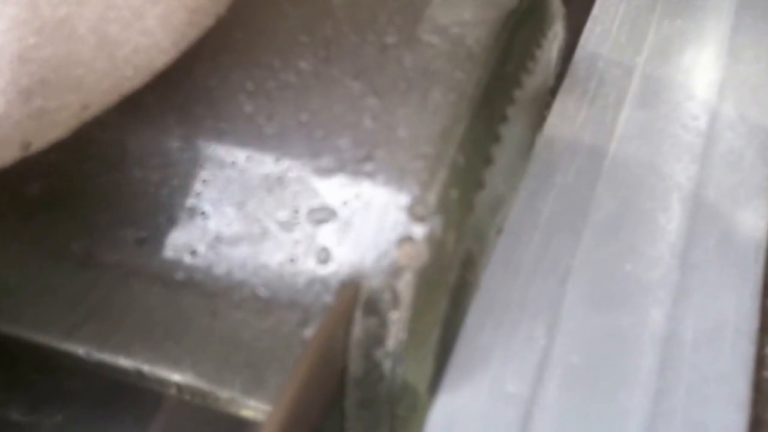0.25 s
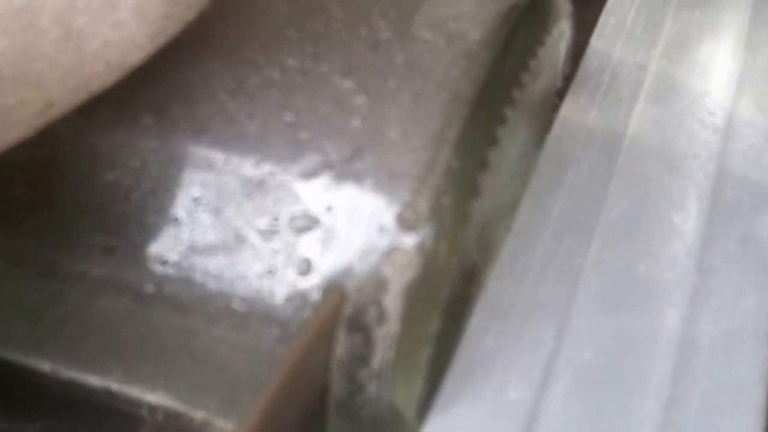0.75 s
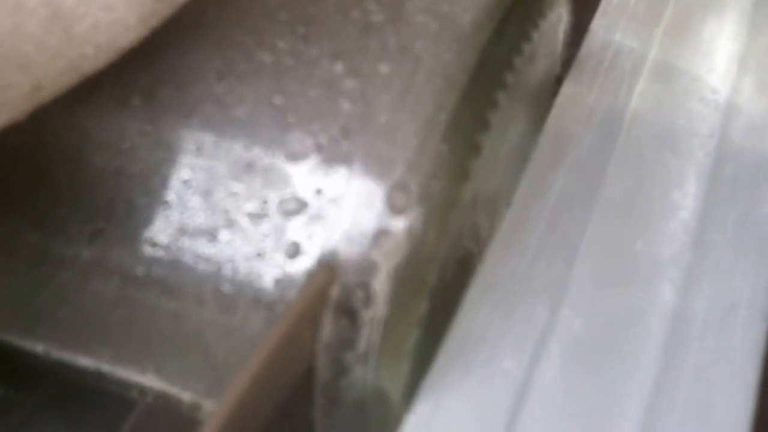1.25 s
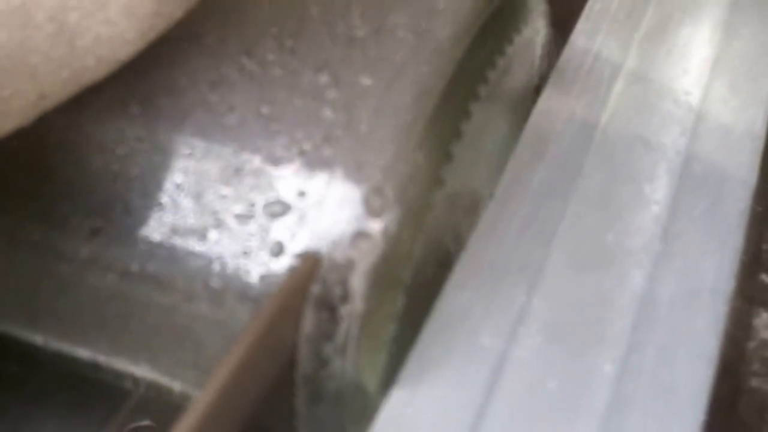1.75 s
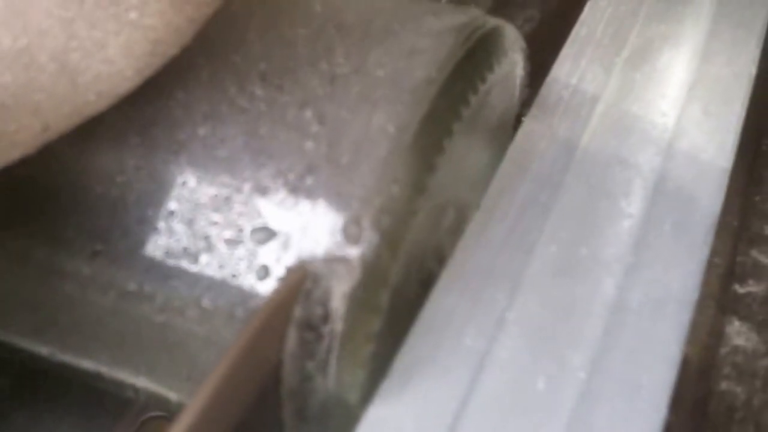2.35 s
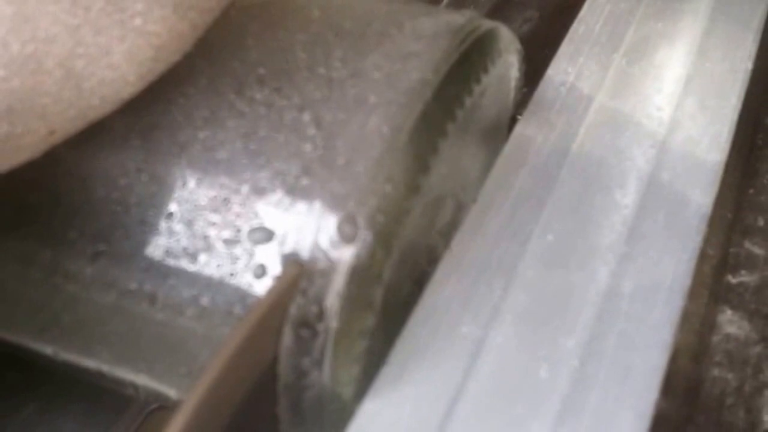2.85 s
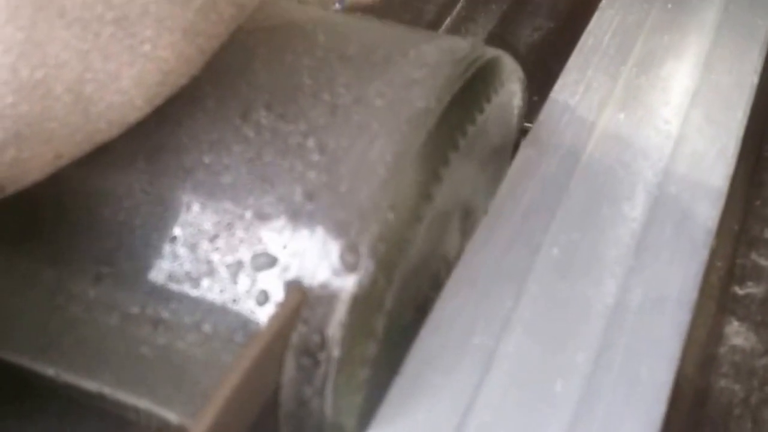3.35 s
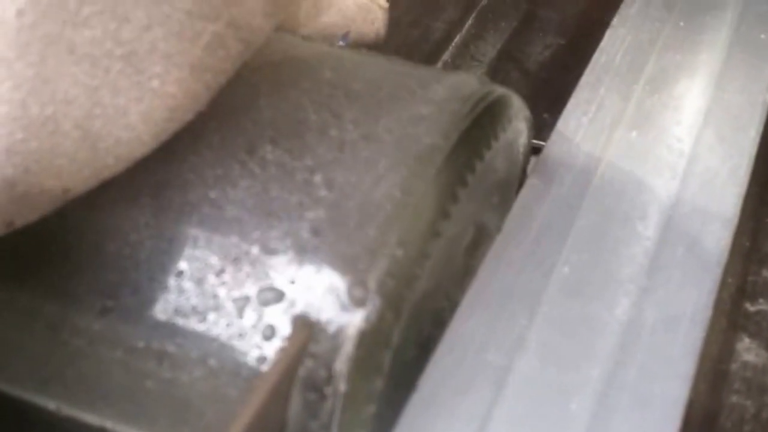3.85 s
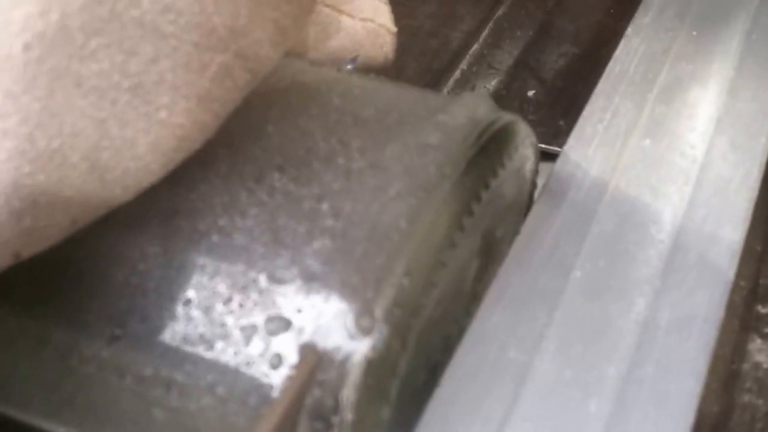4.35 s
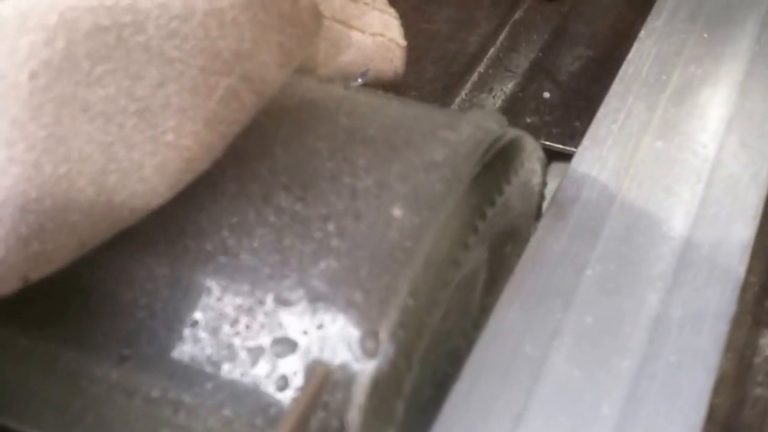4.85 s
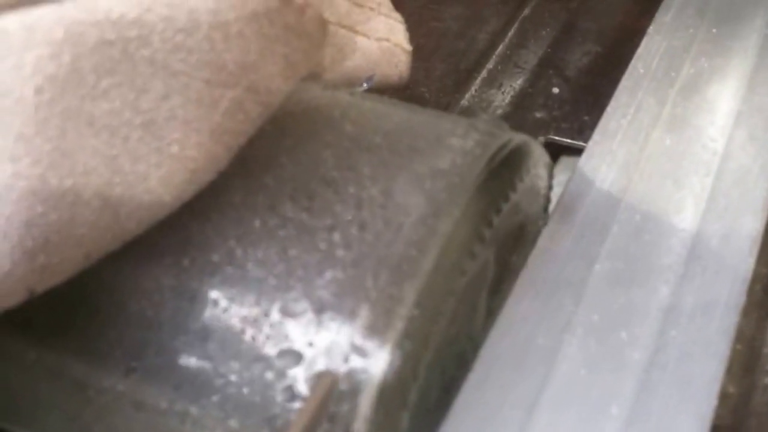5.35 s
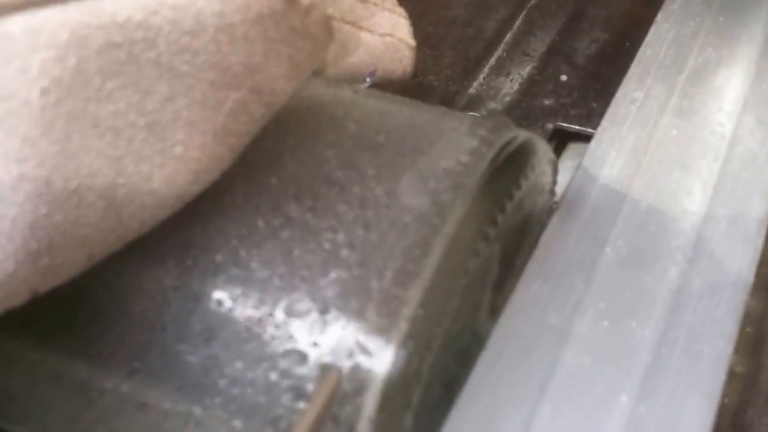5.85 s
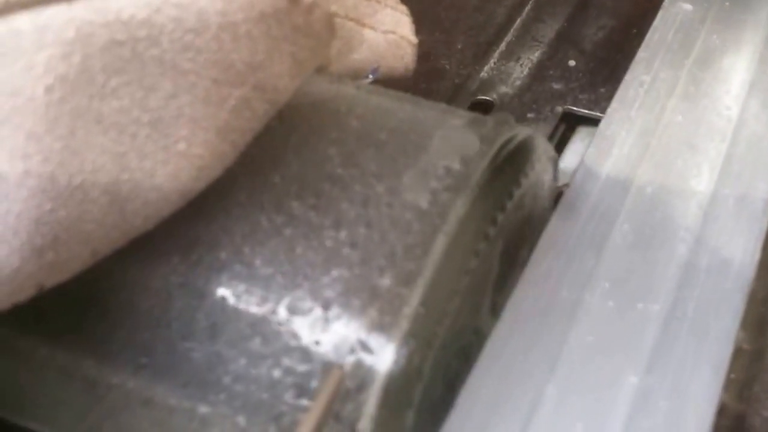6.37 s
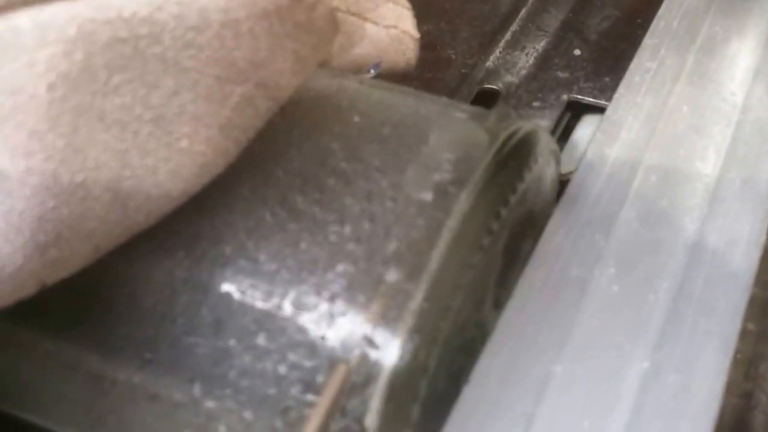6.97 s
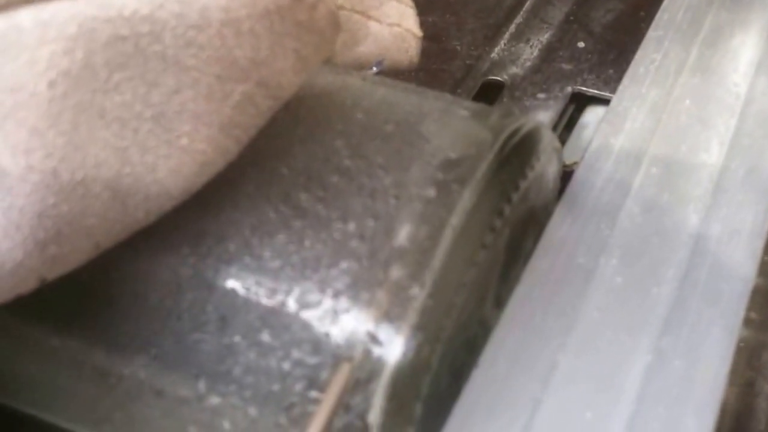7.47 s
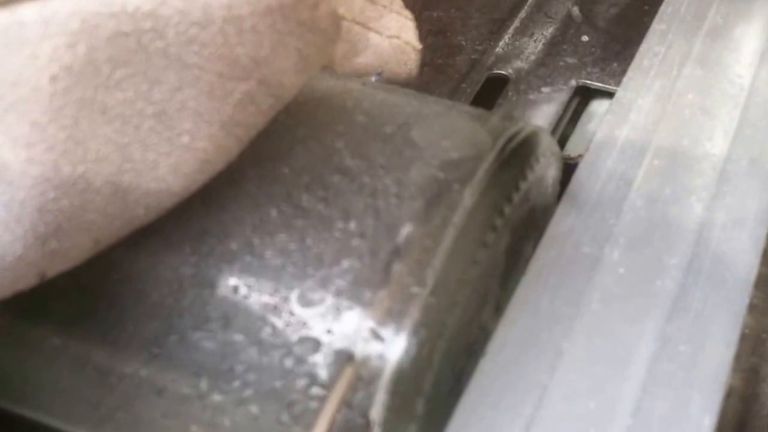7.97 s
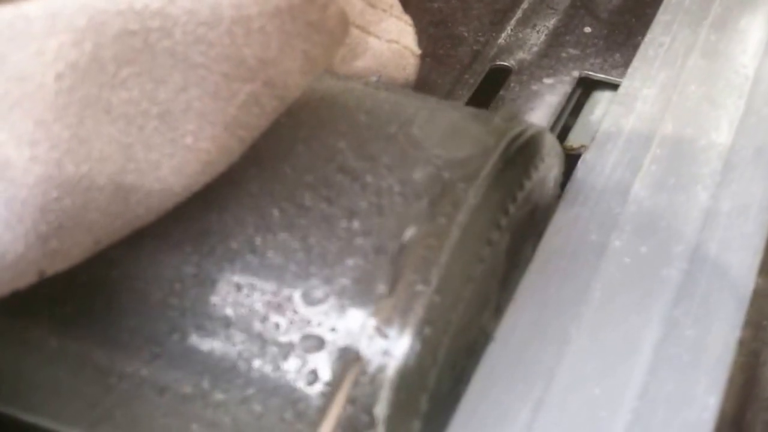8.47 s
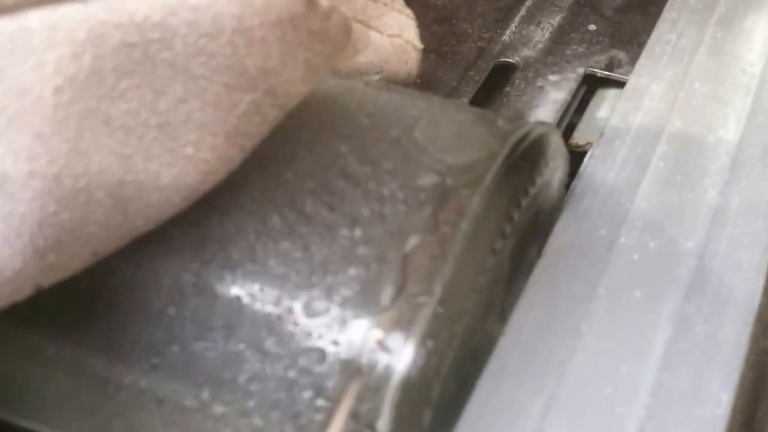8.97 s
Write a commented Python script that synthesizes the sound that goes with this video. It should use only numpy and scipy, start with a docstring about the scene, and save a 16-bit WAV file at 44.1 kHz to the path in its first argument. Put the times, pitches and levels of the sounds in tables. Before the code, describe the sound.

Close, harsh grinding of glass on a wet diamond blade, shrill squeals and watery splutter, then lighter buzzing contact and a last chirpy edge.

```python
"""A gritty grinding whine starts at once, close to the microphone: a small wet saw cuts glass in a workshop.
The diamond rim scrapes the same grit past the glass 59 times a second; this noise rings glass, blade and hood.
Squeals are sines on single multiples of the shaft speed. Water splutters as lumpy noise and slaps; spray hisses.
As the cut runs out, the feed eases, the contact pulses more with each turn, the thin edge chirps
and the motor hum, a sum of low shaft orders, comes through."""
import sys
import numpy as np
from scipy import signal
from scipy.fft import rfft, irfft, next_fast_len
from scipy.io import wavfile
from scipy.ndimage import uniform_filter1d, map_coordinates

SR = 44100
rng = np.random.default_rng(int(sys.argv[2]) if len(sys.argv) > 2 else 0)


def pcm_store(signal):
    """Save signal as 16-bit PCM."""
    levels = np.round(np.clip(np.atleast_2d(signal), -1, 1) * 32767)
    wavfile.write(sys.argv[1], SR, levels.astype(np.int16).T)


N = 406602

# Progress of the cut. Each row: time in seconds, stage (0 entry, 1 middle, 2 exit).
CUT_STAGE = [(0, 0), (1.5, 0.07), (3.6, 0.73), (5.5, 1.45), (7, 1.46), (8.2, 1.8752), (9.22, 2.5)]
# How hard the glass is pushed into the blade. Each row: time in seconds, feed in dB.
FEED_FORCE = [(0, 1), (2.1, 0.5), (2.5, -1.6), (3.3, 0.1), (4.6, -1.3), (5.25, -1.5), (5.5, -2.5),
              (6.5, -6), (7.5, -4.5), (8.25, -4.5), (8.75, -3), (9.22, -6)]
# Slow level of the treble. Each row: time in seconds, level in dB.
TREBLE_LEVEL = [(0, -17.5), (4.5, -18), (5.05, -16), (6.1, -17.5), (6.85, -19), (7.0, -16), (7.5, -16.5),
                (8.4, -16.5), (8.7, -21.5), (9.22, -22)]


def amp(db):
    """Decibels to gain."""
    return 10 ** (np.asarray(db) / 20)


def unit(x):
    """Scaled to rms 1."""
    return x / np.sqrt(np.mean(x ** 2) + 1e-20)


def along(points, hz):
    """Values of (Hz, value) points, interpolated on a log frequency axis."""
    f, v = np.transpose(points)
    return np.interp(np.log(hz + 1), np.log(f + 1), v)


def curves(rows):
    """One value per sample for each column after the time."""
    s, *cols = np.transpose(rows)
    return [np.interp(np.arange(N) / SR, s, c) for c in cols]


def wobble(rate):
    """A smooth random curve, rate knots a second."""
    knots = rng.standard_normal(int(N * rate / SR) + 4)
    return map_coordinates(knots, [np.arange(N) * rate / SR])


def filtered(x, response):
    """x with its spectrum multiplied by a response of frequency."""
    m = next_fast_len(N + SR // 4)
    gain = response(np.fft.rfftfreq(m, 1 / SR))
    return irfft(rfft(x, m) * gain, m)[..., :N]


def below(hz, edge_hz, order=12):
    """Gain of a low-pass, steeper for a higher order."""
    return 1 / (1 + (hz / edge_hz) ** order)


def steady(x, size=8000):
    """x with its slow level, over size samples, held at rms 1."""
    return x / np.sqrt(np.abs(uniform_filter1d(x ** 2, size)) + 1e-12)


def fade_in_out(t, start, end, fade):
    """0-1: a straight fade, 2 * fade seconds long, centred on the start and again on the end."""
    return np.clip(.5 + np.minimum(t - start, end - t) / (2 * fade), 0, 1)


def by_stage(values):
    """A quantity that passes through its entry, middle and exit values as the cut goes on."""
    return np.interp(curves(CUT_STAGE)[0], np.arange(3), values)


def motor(turns):
    """The low orders of the shaft hum through the housing, which drones along with one or another."""
    # Strength of each order in the hum. Each row: shaft order, relative level in dB.
    orders = [(1, -74), (2, -13.5), (3, -2), (4, -0.5), (5, 0), (6, 5.5), (7, 3), (8, 3.5), (9, -10),
              (10, 1.5), (11, -3.5), (12, -2), (13, 4), (14, -10)]
    # Swell of the hum. Each row: time in seconds, level in dB before the trim below.
    hum_level = [(0, -40.5), (3, -39), (6.2, -43.5), (8.3, -39), (9.22, -32)]
    # The housing drones for a while. Each row: start in seconds, end in seconds, shaft order, lift in dB.
    drones = [(2.2, 4.5, 8, 5), (3.6, 8.0, 6, 5), (5.2, 8.9, 3, 7), (6.5, 7.5, 10, 4), (6.75, 8.0, 4, 10),
              (8.1, 9.22, 8, 6), (8.7, 9.22, 4, 6)]
    drone_fade_s, trim_db = 0.06, -7.5
    t = np.arange(N) / SR
    hum = np.zeros(N)
    for order, db in orders:
        lift_db = sum(lift * fade_in_out(t, start, end, drone_fade_s)
                      for start, end, droning, lift in drones if droning == order)
        level = amp(db + lift_db + 3.2 * wobble(3.22))
        hum += level * np.sin(2 * np.pi * (order * turns + rng.random()))
    return amp(curves(hum_level)[0] + trim_db) * hum


def mist():
    """Fine spray hisses whether or not the rim touches, strongest against the treble in mid-cut."""
    # Colour of fine spray off the rim. Each row: frequency in Hz, gain in dB.
    spray_colour = [(3000, -30), (7000, 8), (9000, -17), (12500, 8), (15000, -12)]
    over_treble_db = by_stage((-19, -17, -19))  # entry, middle, exit
    noise = rng.standard_normal(N)
    hiss = unit(filtered(noise, lambda hz: amp(along(spray_colour, hz)) * (1 - below(hz, 3000))))
    return amp(curves(TREBLE_LEVEL)[0] + over_treble_db + 1.4 * wobble(45)) * hiss


def flow():
    """Strength of the splutter: gushes that start fast, hold and die away, over a thinning trickle."""
    # The blade flings off water it picked up. Each row: start in seconds, length in seconds, level in dB.
    gushes = [(0, 0.029, -20.5), (0.323, 0.35, -28), (0.81, 0.05, -39), (1.076, 0.15, -30.5),
              (1.467, 0.15, -26.5), (1.768, 0.21, -28), (2.197, 0.077, -27.5), (2.37, 0.04, -33),
              (2.778, 0.05, -36), (3.363, 0.063, -27), (3.528, 0.04, -29), (3.798, 0.03, -23),
              (3.875, 0.03, -27.5), (4.08, 0.27, -32.5)]
    attack_s, release_s = 0.0066, 0.022
    trickle_db, dries_db_per_s = -33.5, 3
    t = np.arange(N) / SR
    power = amp(trickle_db - dries_db_per_s * t) ** 2
    for start, length, db in gushes:
        before = np.maximum(start - t, 0) / attack_s
        after = np.maximum(t - start - length, 0) / release_s
        power = power + (amp(db) * np.exp(-np.minimum(before + after, 20))) ** 2
    return np.sqrt(power)


def water(slap_hz, slap_db):
    """Water flung off the blade splutters in lumps; larger gouts slap: a damped sine with a noisy splat."""
    # Colour of the splutter. Each row: frequency in Hz, gain in dB.
    splutter_colour = [(15, -57), (25, -35), (64, -12), (178, 1), (413, -4), (445, -5.5), (472, 2),
                       (509, -7.5), (900, -9), (1170, -25), (1980, -120)]
    # Gouts of water. Each row: start in seconds, strength in dB before slap_db is added.
    gouts = [(0.35, -18), (0.587, -12.5), (0.647, -10), (1.136, -14), (1.582, -10), (1.923, -15),
             (2.065, -11), (2.384, -17), (3.369, -14.5), (3.539, -14.5), (3.81, -9.5), (3.877, -8.5)]
    lumps = rng.standard_normal(N) * amp(4.1 * wobble(110))
    splutter = flow() * unit(filtered(lumps, lambda hz: amp(along(splutter_colour, hz))))

    t = np.arange(SR // 10) / SR
    noise = rng.standard_normal(N)
    wet = unit(filtered(noise, lambda hz: below(hz, 1500, order=4) * (1 - below(hz, 190, order=4))))
    slaps = np.zeros(N)
    for (s, db), pitch in zip(gouts, rng.standard_normal(len(gouts))):
        start = round(s * SR)
        # the push falls 60 dB in 17 ms, the splat in 51 ms
        push = np.sin(2 * np.pi * slap_hz * np.exp(.25 * pitch) * t) * amp(-60 * t / 0.017)
        splat = 0.54 * wet[start:][:len(t)] * amp(-60 * t / 0.051)
        slaps[start:][:len(t)] += amp(db + slap_db) * (push + splat)
    return splutter + slaps


def thin_edge():
    """0-1: the blade works slowly into the last thin edge, stays there and breaks out quickly."""
    from_s, to_s = 8.33, 8.59
    rise_db_per_s, fall_db_per_s = 17, 50
    t = np.arange(N) / SR
    early_db = rise_db_per_s * np.maximum(from_s - t, 0)
    late_db = fall_db_per_s * np.maximum(t - to_s, 0)
    return amp(-early_db - late_db)


def touch(turns):
    """The blade runs out of true and bears harder for half of each turn; a lighter feed swings more."""
    swing_db, more_per_db_eased, most_db = 0.4, 0.62, 2.5  # swing at 0 dB feed, its growth, its limit
    edge_db = 1.0  # more swing on the thin edge
    feed_db, = curves(FEED_FORCE)
    swing = np.minimum(swing_db - more_per_db_eased * feed_db + edge_db * thin_edge(), most_db)
    angle = 2 * np.pi * (turns + 0.008 * wobble(2.54))
    return steady(amp(swing * np.tanh(2 * np.cos(angle))))


def chirps(turns, pressure):
    """On the way out the thin edge of the glass rings at each touch and flicks up in pitch."""
    chirp_db = -18.5
    within = (turns + .5) % 1 - .5
    # the flick, a tenth of a turn after the hardest contact, gains two cycles on the ring
    gained = np.tanh((within - .1) / .045)
    ring = np.sin(2 * np.pi * (85 * turns + gained) + .3 * wobble(20))
    bite = pressure * np.exp(-((within - .03) / .24) ** 2)
    return amp(chirp_db) * thin_edge() * steady(bite * ring)


def squeals(turns, pressure):
    """Modes of blade and glass lock onto multiples of the shaft speed, swell, waver and let go."""
    # Squeals. Each row: start in seconds, end in seconds, shaft order, level in dB before trim and waver.
    notes = [(0, 1.05, 69, -21), (0, 3.7, 44, -35.5), (0, 5.7, 30, -33), (0, 7.9, 19, -39),
             (1.0, 3.6, 81, -26), (1.2, 1.7, 78, -26), (1.4, 2.3, 142, -31), (1.5, 3.1, 118, -26),
             (1.7, 3.6, 69, -25), (2.95, 3.5, 29, -27), (3.6, 4.7, 142, -29), (3.8, 4.75, 69, -22),
             (3.9, 4.8, 81, -23), (3.9, 5.4, 65, -27), (3.9, 6.3, 121, -30), (4.4, 5.7, 84, -27),
             (4.75, 5.8, 34, -32), (6.0, 8.3, 68, -27), (6.3, 8.1, 99, -24), (6.7, 8.8, 20, -39),
             (6.75, 8.7, 29, -27.5), (8.1, 8.8, 40, -34), (8.1, 8.8, 86, -22), (8.35, 8.95, 57, -24)]
    fade, waver_db, drift, trim_db = 0.14, 3.0, 0.53, -0.5  # s, dB, radians, dB
    t = np.arange(N) / SR
    waver = np.array([0.8 * wobble(14) + 0.9 * wobble(40), wobble(9)])
    out = np.zeros(N)
    for (start, end, order, db), (shift, phase) in zip(notes, rng.random((len(notes), 2))):
        now = np.flatnonzero((t > start - fade) & (t < end + fade))
        swell = fade_in_out(t[now], start, end, fade)
        level, slip = waver[:, (now + int(shift * N)) % N]  # each note reads the waver from its own place
        tone = np.sin(2 * np.pi * (order * turns[now] + phase) + drift * slip)
        out[now] += swell * amp(db + waver_db * level) * tone
    return amp(trim_db) * pressure * np.sqrt(2) * out


def rim(turns, memory, count):
    """A random pattern of count points round the rim, read turn by turn; it wears away over memory turns."""
    keep = np.exp(-1 / memory)
    fresh = rng.standard_normal((700, count))  # one row a turn
    worn = signal.lfilter([np.sqrt(1 - keep ** 2)], [1, -keep], fresh, axis=0)
    return unit(map_coordinates(worn.ravel(), [(turns + 100) * count]))


def cut_colour(hz, stage):
    """Gain of the grit's spectrum with the resonances' boosts at one stage of the cut."""
    # Scraping of the grit. Each row: frequency in Hz, gain in dB at entry, at middle, at exit.
    grit = [(100, -43, -36, -33), (242, -4.5, -11, -29.5), (543, -8.5, -19.5, -15.5),
            (860, -12.5, -17.5, -18.5), (2500, -10, -16, -8), (2855, -13.5, -17, -15), (4400, 5, -7.5, 0.5),
            (6980, -4, -5.5, -1.5), (9420, -11, -13, -14), (10600, -14.5, -20, -9), (15800, -26, -26, -38)]
    # Resonances of glass, blade and hood. Each row: centre in Hz, width in Hz, boost in dB at entry,
    # at middle, at exit.
    resonances = [(1098, 213, 11, 12, 7), (1463, 89, 10, 6.5, -3), (1763, 345, 16, 16, 5.5),
                  (2424, 47, 10, 8.5, -1), (2605, 99, 16.5, 9, -7), (3240, 670, 6, 16.5, 9),
                  (3974, 775, 9.5, 21.5, 1), (4723, 133, 9.5, 14, -11), (4998, 233, 4, 16.5, 9.5),
                  (5480, 260, -4.5, 11.5, 0.5), (5880, 74, 7.5, 14.5, 7.5), (6153, 106, 8, 12.5, 6),
                  (7050, 71, 14.5, 2, -9), (7233, 123, 14.5, 11.5, 4), (8390, 200, 11.5, 12.5, 7),
                  (9000, 110, 5, 4, 10), (9700, 110, 12, 13.5, 9), (10820, 110, 6, 5, -19),
                  (11370, 150, 9, 17, -2)]
    db = along(np.array(grit)[:, [0, stage + 1]], hz)
    for centre, width, *boost in resonances:
        db = db + boost[stage] / (1 + (2 * (hz - centre) / width) ** 2)
    return amp(db) * (1 - below(hz, 120, order=4))  # small parts radiate no bass


def jolts():
    """The glass catches on the rim or eases off for a moment: each a smooth bump of force, in dB."""
    # Each row: centre in seconds, length in seconds, force in dB (+ catches, - eases).
    catches = [(1.573, 0.12, 2.5), (1.69, 0.1, -2), (1.83, 0.12, 1.5), (3.04, 0.13, -2.5),
               (3.245, 0.074, 1.5), (5.27, 0.088, 1), (5.442, 0.24, -3), (5.685, 0.075, 1),
               (6.348, 0.023, 5.5), (6.672, 0.066, 3.5), (6.78, 0.18, -1), (7.446, 0.29, -2),
               (7.98, 0.07, 3), (9.043, 0.048, 1), (9.13, 0.069, -4.5)]
    t = np.arange(N) / SR
    return sum(db * np.exp(-(2 * (t - s) / length) ** 2) for s, length, db in catches)


def grinding(turns, pressure):
    """Grit that returns every turn, and fresh chipping, ring the glass and the steel as hard as the hand feeds."""
    repeat_deep, repeat_edge = 0.57, 0.94  # share of the scrape's power that returns: deep glass, thin edge
    glass_base_db, glass_jolt = -13.5, 0.72  # ring of the glass at 0 dB feed; share of a jolt it follows
    hood_follows = 0.69  # dB per dB of feed
    share = np.clip(repeat_deep + (repeat_edge - repeat_deep) * thin_edge(), 0, 1)
    returning = np.sqrt(share) * rim(turns, memory=13.9, count=740)
    chipping = np.sqrt(1 - share) * rng.standard_normal(N)
    clumps_db = 1.17 * rim(turns, memory=4.9, count=18)  # diamonds sit in clumps
    scrape = (returning + chipping) * amp(clumps_db + 0.61 * wobble(32))

    depth, = curves(CUT_STAGE)
    rung = np.zeros(N)
    for stage in range(3):
        nearness = np.clip(1 - abs(depth - stage), 0, 1)
        rung += nearness * filtered(scrape, lambda hz: cut_colour(hz, stage))
    low = filtered(rung, lambda hz: below(hz, 3000))
    high = filtered(rung, lambda hz: 1 - below(hz, 5500))
    middle = rung - low - high

    feed_db, = curves(FEED_FORCE)
    jolt_db = jolts() + 0.083 * wobble(11)  # the hand is never quite steady
    hood_db = by_stage((-21, -20.5, -19.5)) + hood_follows * feed_db + jolt_db  # entry, middle, exit
    glass_db = glass_base_db + feed_db + glass_jolt * jolt_db
    hiss_db = curves(TREBLE_LEVEL)[0] + jolt_db + 0.2 * wobble(24)
    hood = amp(hood_db + 0.29 * wobble(30)) * steady(low * pressure ** 0.7)  # it rings on between touches
    glass = amp(glass_db + 0.6 * wobble(40)) * steady(middle * pressure)
    hiss = amp(hiss_db + 0.83 * wobble(35)) * steady(high * pressure)
    return filtered(hood + glass + hiss, lambda hz: 1 - below(hz, 85, order=4))


def scene():
    """One shaft times the motor and the cut; water and spray are laid around them."""
    # Speed of the shaft. Each row: time in seconds, turns per second.
    shaft_speed = [(0, 59.46), (5.3, 59.46), (6.4, 59.25), (7.8, 59.23), (8.2, 59.04), (9.22, 59.0)]
    turns = np.cumsum(curves(shaft_speed)[0]) / SR
    pressure = touch(turns)
    background = motor(turns) + mist() + water(slap_hz=286, slap_db=-1.5)
    cut = chirps(turns, pressure) + squeals(turns, pressure) + grinding(turns, pressure)
    return (background + cut)[None]


def record(dry):
    """The microphone rounds off the highest peaks, drops the deep bass and keeps nothing above its band limit."""
    top_hz = 15200
    rounded = dry / (1 + np.abs(dry / 0.98) ** 6) ** (1 / 6)
    thin = signal.sosfilt(signal.butter(2, 80, "high", fs=SR, output="sos"), rounded)
    return filtered(thin, lambda hz: hz < top_hz)


dry = scene()
out = record(dry)
pcm_store(out)
```